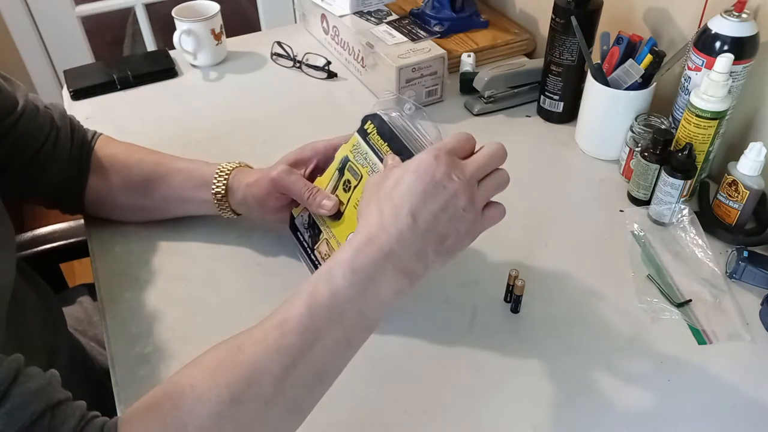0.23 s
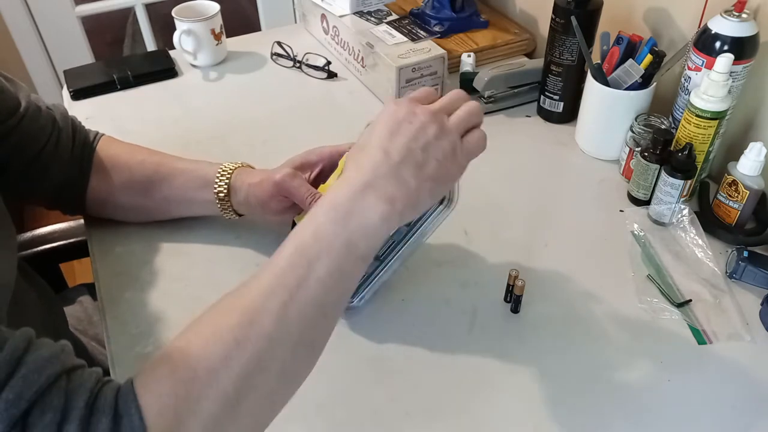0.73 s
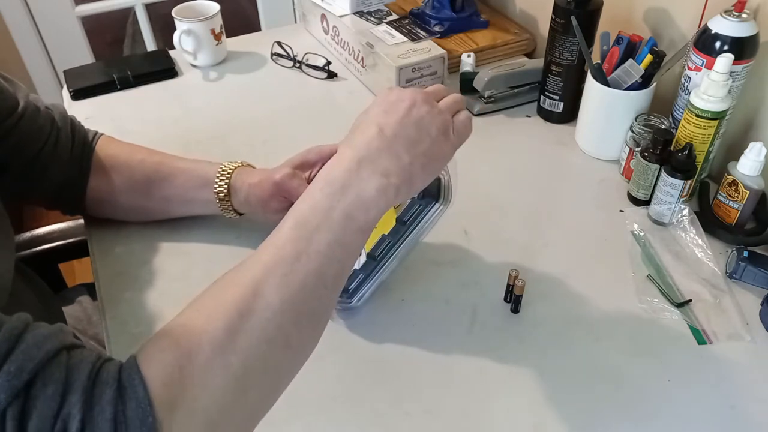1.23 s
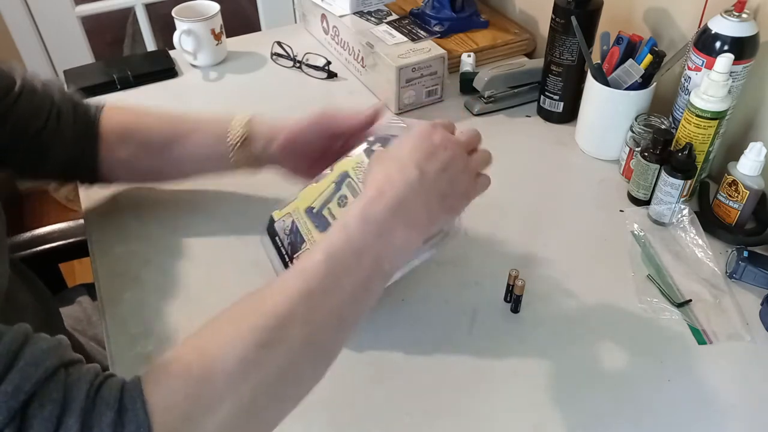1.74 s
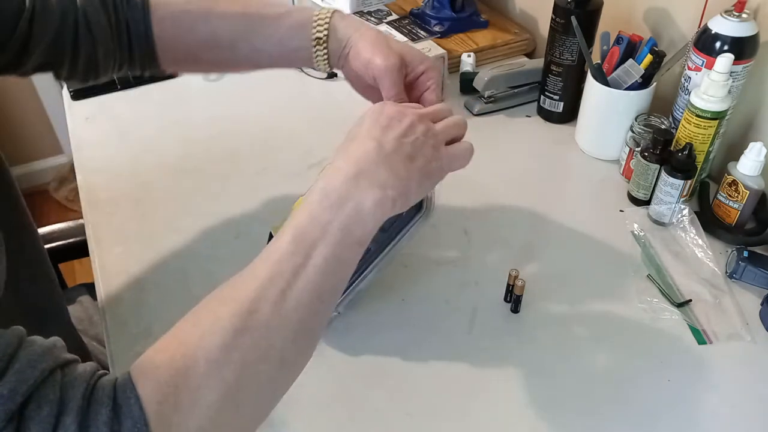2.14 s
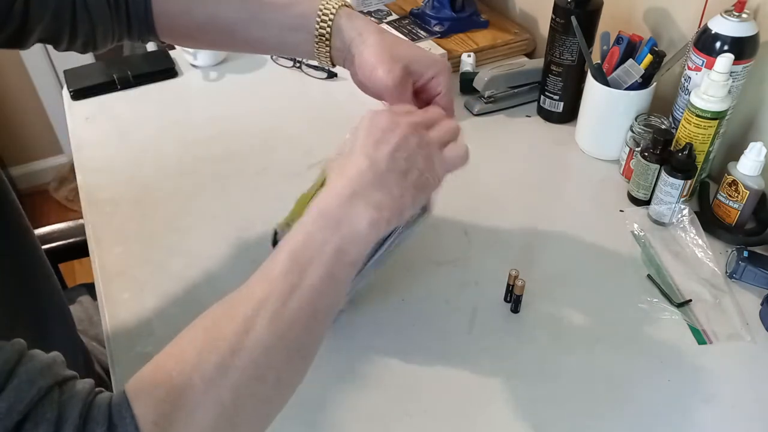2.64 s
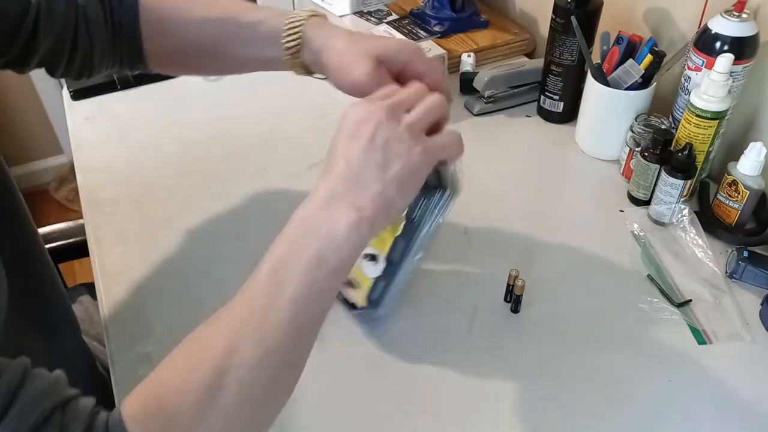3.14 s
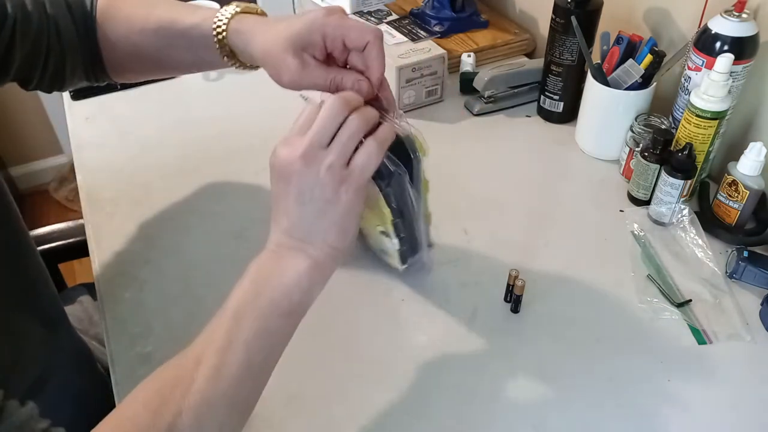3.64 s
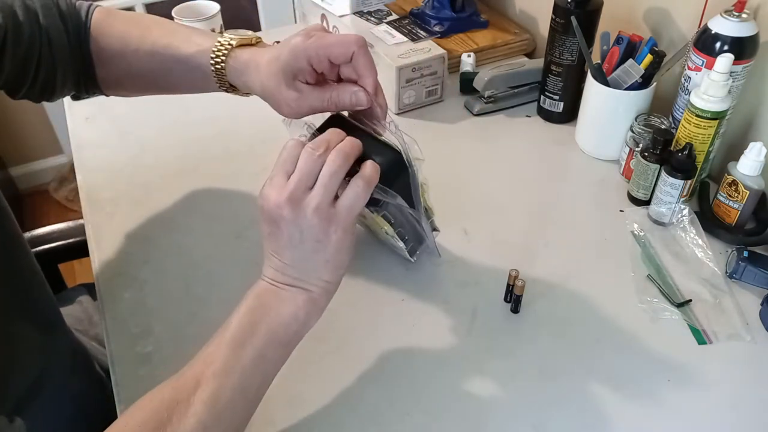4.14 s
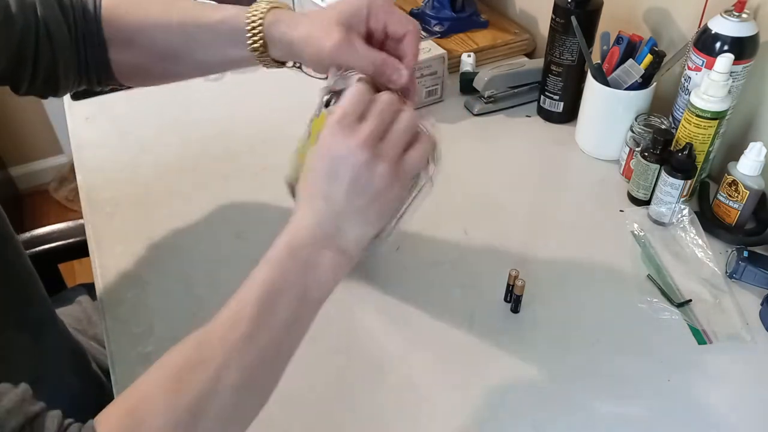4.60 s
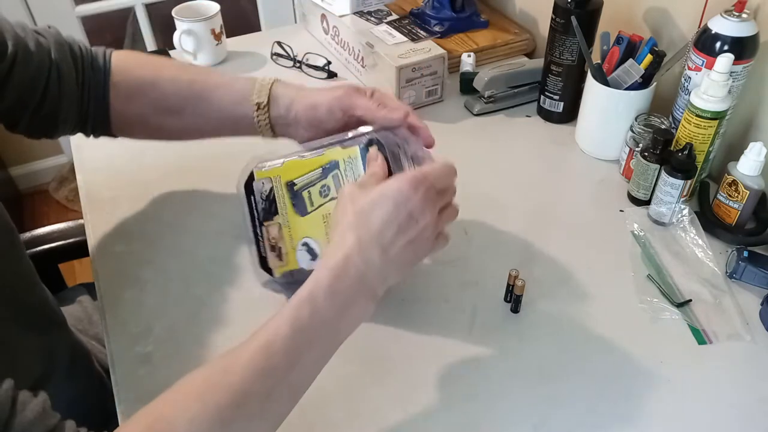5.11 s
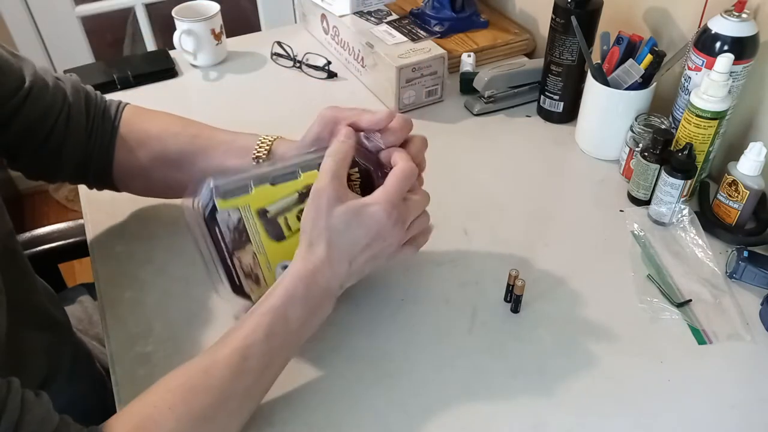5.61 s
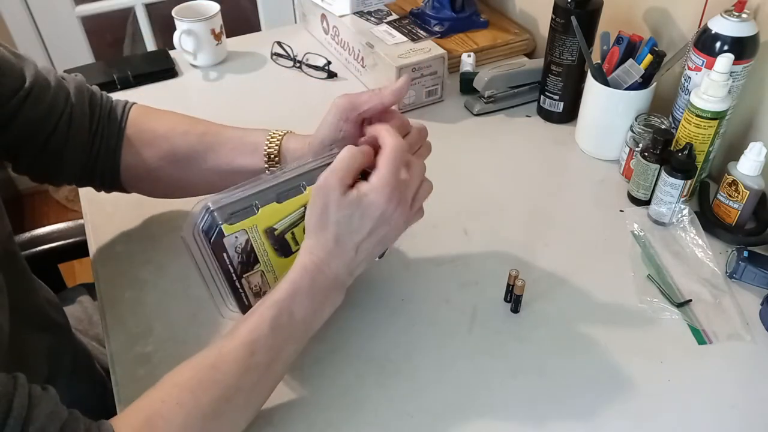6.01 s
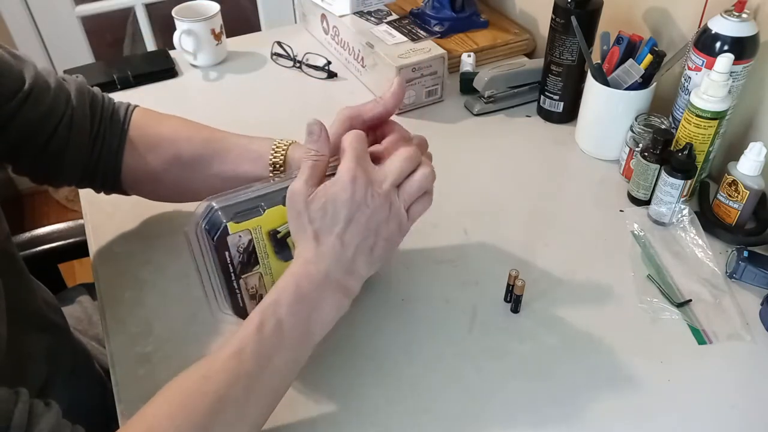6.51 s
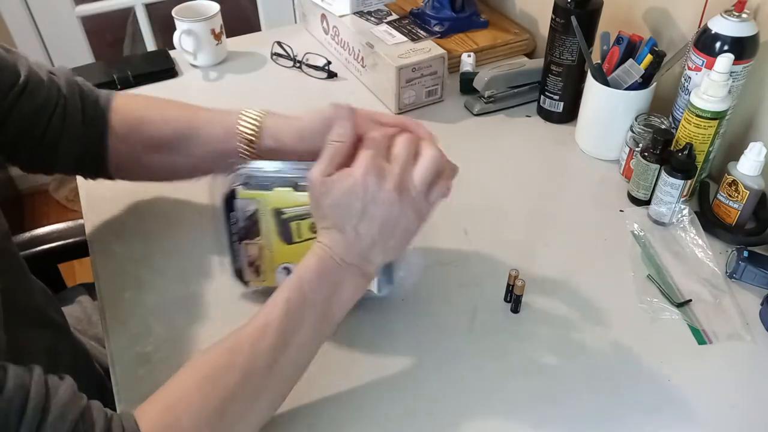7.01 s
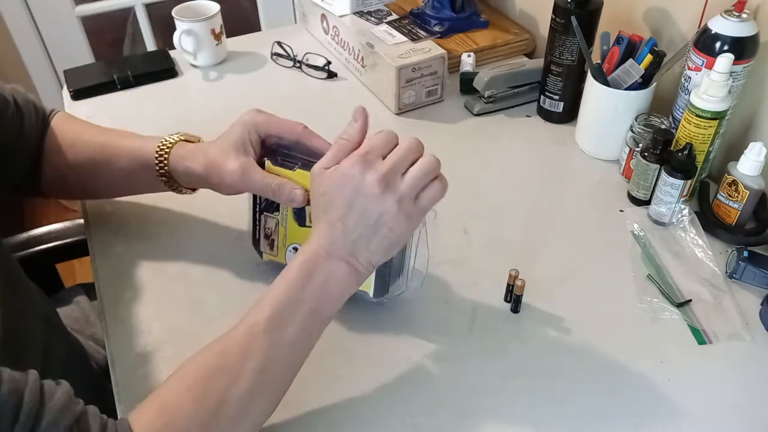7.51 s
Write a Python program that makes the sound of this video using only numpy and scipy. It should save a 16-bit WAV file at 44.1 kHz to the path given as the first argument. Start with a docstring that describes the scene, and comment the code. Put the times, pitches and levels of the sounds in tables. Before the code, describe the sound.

Hands pry at a stiff plastic clamshell pack on a table. A sharp snap and a short rip of the seam come first, then scattered clicks and faint rubbing, and a second snap and rip. The pack scrapes, thumps low on the tabletop, and buckles in a dense burst of crackling before a few last snaps and a hollow knock. It is heard in mono in a quiet furnished room with a short echo.

```python
"""A table in a furnished room, where hands pry at a stiff plastic clamshell pack; heard in mono.
The pack rubs along in stick-slip strokes, its panels buckle with sharp snaps, and its seam rips in
short runs. Now and then it knocks on the table top, which booms low. The plastic gets its colour from
the pack's hollow, its shell and its thin edges; a short room tail and a quiet hush sit behind it."""
import sys
import numpy as np
from scipy import signal
from scipy.io import wavfile

SR = 44100
rng = np.random.default_rng(int(sys.argv[2]) if len(sys.argv) > 2 else 0)


def bounce(signal):
    """Save signal as a 16-bit WAV file at the path given by the first command-line argument."""
    frames = np.transpose(np.atleast_2d(signal))
    limited = np.clip(frames, -1, 1)
    pcm = np.round(limited * 32767).astype(np.int16)
    wavfile.write(sys.argv[1], SR, pcm)


N = 341775

# buckling panels: t/s, crack length/ms, level/dB, bass trim/dB, treble trim/dB, room send/dB, panel f/Hz
SNAPS = [(0.0594, 0.88, -46.0, -17.0, 12, -12, 4500), (0.1057, 1, -14, -11, 4.5, -1.5, 5400),
         (0.4523, 6.1, -39, -16, -1.5, -0.5, 1810.0), (0.5341, 4.3, -37.5, -3.0, -30.0, -41.0, 1490.0),
         (0.6214, 2.9, -29.5, -16.0, 1, 1.5, 1420), (0.8457, 4.8, -46.5, -6.5, -3, 1, 1385),
         (0.892, 3.3, -24, -6, 12, -2.5, 2820), (0.9628, 3.2, -20.5, -12.5, -4, -6, 1700),
         (0.9751, 5.4, -10, -20.0, 1.5, -6.5, 1885), (1.1206, 3.6, -19.0, -12, 8.5, -8.0, 5600),
         (1.2899, 2, -12.5, -13, -3.5, -8.5, 1890), (1.4143, 2.1, -32, -14.5, -39, 0.5, 2830),
         (1.5598, 2.5, -39.5, -2.5, 18.5, -3.5, 4500.0), (1.828, 3.0, -66.5, -28.5, 12.5, 11.5, 1900.0),
         (2.0526, 2.9, -41.5, -6, -6, -15, 1840), (2.0807, 1.3, -40, -6, -17, -18, 1890),
         (2.2014, 4.6, -34.5, -18, 4.5, -9, 1810), (2.35, 1.8, -42.5, -26.5, -7.0, -3, 2290),
         (2.4224, 2.6, -35, -40.0, 19, -6, 1860), (2.4393, 4.5, -26, -25, 8, -4.5, 1830),
         (2.4603, 2, -28.0, -20, 8, -6, 3480.0), (2.471, 3.1, -31.5, -20, 11.5, -2, 1850),
         (2.4846, 4.4, -36, -32.5, 14.5, -7, 1830), (2.5469, 3.1, -24.5, -31, 7.5, -6.5, 1550.0),
         (2.6612, 1.7, -8, -19, 5, -6, 1800), (2.718, 2.5, -15, -17, -1.5, 1.5, 1310),
         (3.1334, 3.1, -30.5, -12.0, -5.5, 0, 1790), (3.215, 4.5, -27, -20.5, -8, -7.5, 1610),
         (3.331, 2.6, -26, -4, -10, -7, 1720.0), (3.448, 3.8, -43.5, -15.5, 8.5, -3, 1790.0),
         (3.483, 2.5, -40, -3, 3.5, 2, 1120), (4.1777, 1.9, -31.5, 2.5, -32, -7.5, 1360.0),
         (4.268, 2.8, -40.5, -14, 4, -8.5, 4570.0), (4.4792, 2.7, -39, -11.5, -35.0, -1, 2140.0),
         (4.6576, 5.4, -28, -4, -3.0, -2, 2030.0), (4.8024, 2.8, -29.5, -13, -8.0, 0, 1440),
         (4.9722, 5.7, -26.5, -11, -11, 1, 2330), (5.073, 1.9, -28, -9, 2.5, -4.5, 1640),
         (5.1342, 1, -37.5, -8, 0, -9, 5760), (5.2729, 0.93, -27.5, -11, 0, 1.5, 9200),
         (5.2812, 2.6, -19.5, -12, 2, -7, 8700), (5.4252, 1, -30.5, -9, 2, -20.0, 6370),
         (5.5239, 4.4, -25, -18.5, -14, -13.5, 1700.0), (5.5441, 4.3, -12, -14, -0.5, -7, 1700),
         (5.5637, 1, -7.5, -23.5, -0.5, -5, 2930.0), (5.5857, 3.3, -12.5, -12.5, 0.5, -4.5, 2070.0),
         (5.631, 3.0, -19, -2, 1, -26, 1200.0), (5.647, 0.65, -13.5, -8, 3.5, -5.5, 1990),
         (5.6667, 1.6, -12.0, -19.5, -17, -3.5, 2800), (5.683, 4, -18, -16, -6, -19, 2700),
         (5.758, 2.3, -31.5, -11, 0, -19, 2000.0), (5.7713, 0.61, -20, -12, -7, -2.5, 2130),
         (5.783, 2.0, -25, -11, -2, -13, 2470), (5.8066, 0.58, -12.5, -9.5, -6, -8.5, 2520),
         (5.8144, 4.2, -9.5, -25, -6.5, -5, 2510), (6.3725, 3.7, -21, -10, -2, -8.0, 3090),
         (6.7334, 4.3, -20.5, -6.5, -11, -4, 2360), (6.7883, 10, -23.5, -11, -3, -5.5, 2370),
         (6.8104, 1.8, -29, -12, 4, -2, 10000), (6.826, 1.1, -8.5, -13.5, -12.5, -3, 10130),
         (7.1417, 3.7, -29, -15, -24, 4.5, 3030.0), (7.1598, 2.1, -24.5, 3.5, 2, -5, 7300),
         (7.2511, 2.9, -34, 2, -32.0, -2.5, 2450), (7.5919, 1.6, -49.5, -13.0, 4.5, -19, 2740),
         (7.6906, 1.4, -30.5, -1, -11, -3, 1480.0), (7.6988, 4.8, -18, -10, -4.5, -2, 1600),
         (7.713, 3.0, -18.5, -13.5, -33.0, 0, 2200.0)]
# resonances of the table top and the pack's hollow, shell and thin edges: f/Hz, width/Hz, level/dB
TABLE_MODES = [(69, 15, -7.5), (122.5, 9.7, 5), (181.3, 13, 3), (233.2, 5.7, 2)]
HOLLOW_MODES = [(284, 76, 2), (418, 86.5, 5), (588.5, 165, -2), (697, 85, 6.5), (711, 318, 0)]
SHELL_MODES = [(1014, 470, 6.5), (1550, 654, 10.5), (2315, 1290, 7), (2832, 250, 10), (3460, 1500, -6.5)]
EDGE_MODES = [(4073, 1840, -3), (6500, 1400, -1), (7980, 730, 6.5), (9570, 6500, 0), (13600, 9800, -7.5)]


def from_db(db):
    """Gain of a level in dB."""
    return 10 ** (np.asarray(db) / 20)


def rms_one(x):
    """Scaled to rms 1."""
    return x / np.sqrt(np.mean(x ** 2) + 1e-20)


def at_hz(points, hz, column=1):
    """A column of a table, read on a log-frequency axis."""
    points = np.array(points)
    return np.interp(np.log(hz), np.log(points[:, 0]), points[:, column])


def resonator(hz, width_hz):
    """Filter coefficients of one resonance, with a peak gain of 2."""
    r = np.exp(-np.pi * width_hz / SR)
    return [1 - r * r, 0, r * r - 1], [1, -2 * r * np.cos(2 * np.pi * hz / SR), r * r]


def body(x, modes):
    """Parallel resonances with alternating signs, scaled so that white noise keeps about its rms."""
    out, power = 0, 0
    for k, (hz, width_hz, level_db) in enumerate(modes):
        ring = signal.lfilter(*resonator(hz, width_hz), x + 1e-18) / 2
        out = out + (-1) ** k * from_db(level_db) * ring
        power += from_db(2 * level_db) * np.pi * width_hz / SR
    return out / np.sqrt(power)


def dulled(x, hz):
    """Low-pass: thick, soft parts radiate no treble."""
    return signal.sosfilt(signal.butter(2, hz, fs=SR, output="sos"), x)


def grains(per_s, spread_db):
    """Random slips of very unequal size; rms 1."""
    sizes = from_db(spread_db * np.minimum(rng.exponential(1, N), 5)) * rng.choice([-1, 1], N)
    return rms_one(sizes * (rng.random(N) < per_s / SR))


def coloured(size, gain_of_band):
    """Half-octave bands of noise, each times its own gain."""
    out, white = 0, rng.standard_normal((2, size))
    edges = 30 * 2 ** np.arange(0, 9.6, .5)
    for k, (low, high) in enumerate(zip(edges, edges[1:])):
        band = signal.butter(2, [low, min(high, .45 * SR)], "band", fs=SR, output="sos")
        out = out + signal.sosfilt(band, white[k % 2]) * gain_of_band(np.sqrt(low * high))
    return out


def room_tone():
    """A steady, quiet hush with scooped mids."""
    # spectrum of the hush: f/Hz, relative density/dB
    spectrum = [(30, -9.5), (390, -11.5), (900, -25.5), (4000, -27), (9000, -11.5), (15500, -8)]
    return from_db(-68) * rms_one(coloured(N, lambda hz: from_db(at_hz(spectrum, hz))))


def rubbing(pressed_from_s=3.1):
    """Strokes swell and fade over a faint rustle; stick-slip grains drive the table and the pack."""
    # hands and table sliding along the pack: peak t/s, time to fade by 20 dB/s, shell level/dB,
    # then relative to the shell: boom/dB, hollow/dB, crackle/dB
    strokes = [(0.0, 0.067, -48, -5.5, 3, -10), (.56, 0.29, -47, -34, 2, -29),
               (0.68, 0.064, -46, -7, 3.5, 4.5), (1.577, 0.13, -43, -5.5, 2.5, 0.5),
               (2.1, 0.21, -55, -2, -0.5, -1), (2.52, 0.099, -46.5, -7, 1, 1),
               (3.15, 0.25, -61.5, -2, 17, -20), (3.23, 0.094, -42, -10, 7, -5),
               (3.583, 0.098, -28.5, -21, -2, -9), (3.739, 0.075, -37.5, -2.5, 11, -5.5),
               (4.288, 0.095, -64, 22, 5, -3), (4.583, 0.053, -36.5, -3, 4.5, -5),
               (4.72, 0.12, -48, -33, -25, 8.5), (4.856, 0.041, -24, -21, 4, -10.5),
               (5.016, 0.069, -35.5, -4.5, 7.5, -6.5), (5.23, 0.079, -37, -12, 5.5, -3),
               (5.471, 0.15, -33, -6.5, 4, -10), (5.602, 0.13, -19.5, -18, -3.5, -16),
               (5.675, 0.052, -19.5, -12.5, 1, -4), (5.824, 0.076, -25, -16, 4.5, -13),
               (6.38, 0.02, -35, -21, -5, -0.5), (6.48, 0.019, -37, -14, -0.5, -4),
               (6.619, 0.051, -26, -12, 3, -6), (6.77, 0.062, -29.5, -9, -2, -13),
               (6.87, 0.052, -29, -9, 1, 0), (6.96, 0.075, -23, -41, -6.5, -6),
               (7.142, 0.12, -32, -13, 4, -12.5), (7.474, 0.13, -37, -3.5, 5, -10.5),
               (7.75, 0.043, -23.5, 2, 1, -4.5)]
    # fingers rustling between strokes: t/s, shell level/dB
    rustle = [(0, -76), (.3, -46.5), (.55, -74), (.82, -80), (1.3, -43), (1.5, -63), (1.8, -73),
              (2.3, -60.5), (2.62, -64), (2.95, -53), (3.4, -49), (3.8, -61), (4.0, -65), (4.45, -84.5),
              (4.6, -74.5), (5.15, -48), (5.4, -67.5), (6.13, -54), (6.33, -80), (6.55, -52), (7.05, -43),
              (7.35, -45.5), (7.65, -57.5), (7.75, -52)]
    # forearms shifting on the table: f/Hz, width/Hz, level/dB
    rumble_modes = [(64, 38, 0), (130, 70, 3)]
    peak_s, fade_s, shell_db, boom_db, hollow_db, crackle_db = np.array(strokes).T[:, :, None]
    steps = np.arange(0, N + 64, 64)
    late = (steps / SR - peak_s) / fade_s
    stroke_db = shell_db - 20 * np.where(late > 0, late, -late / 1.15) ** 1.7   # rise outlasts fade
    rustle_db = np.interp(steps / SR, *np.transpose(rustle))

    def envelope(stroke_trim_db=-np.inf, rustle_trim_db=-np.inf):
        power = np.sum(from_db(2 * (stroke_db + stroke_trim_db)), axis=0)
        power += from_db(2 * (rustle_db + rustle_trim_db))
        return np.interp(np.arange(N), steps, np.sqrt(power))

    coarse, fine = grains(700, spread_db=3.0), grains(4000, spread_db=3.5)
    pressed = np.arange(N) > pressed_from_s * SR   # pack held down: the rustle rings the table top
    arms = envelope(rustle_trim_db=-5)
    top = body((envelope(boom_db) + pressed * arms) * coarse, TABLE_MODES)
    rumble = body(~pressed * arms * coarse, rumble_modes)
    boom = dulled(top + rumble, hz=400)
    hollow = dulled(body(envelope(hollow_db, -1.5) * coarse, HOLLOW_MODES), hz=1490)
    friction = envelope(0, 0) * fine
    shell = dulled(body(friction, SHELL_MODES), hz=4500) + from_db(-21) * panel_ring(friction)
    crackle = body(envelope(crackle_db, -4) * fine, EDGE_MODES)
    return boom + hollow + shell + crackle


def panel_ring(friction, width_hz=490):
    """The panel that buckled last rings on at its own pitch under the rubbing."""
    out, state = np.zeros(N), np.zeros(2)
    times_s, pitches_hz = np.array(SNAPS)[:, [0, -1]].T
    starts = np.sort((times_s * SR).astype(int))
    for start, end, hz in zip(starts, [*starts[1:], N], pitches_hz):
        span = slice(start, end)
        out[span], state = signal.lfilter(*resonator(hz, width_hz), friction[span] + 1e-18, zi=state)
    return out / 2 / np.sqrt(np.pi * width_hz / SR)


def snaps(click_s=0.0032, spike_share=.55, colour_spread_db=3, places=3):
    """A panel buckles: a click, then a brief crack. Gives the dry snaps and clicks for the room sends."""
    age = np.arange(900) / SR
    click = rms_one(1. * (age == 0)) * np.sqrt(click_s / age[-1])
    panel_share = np.array([[1.8], [.38]])   # dry, room send
    low, upper = np.zeros((2, 1 + places, N + len(age)))
    for k, (s, length_ms, level_db, bass_db, treble_db, send_db, panel_hz) in enumerate(SNAPS):
        length_s = length_ms / 1000
        intensity = np.sqrt(click_s / length_s)   # a short crack is more intense
        crack = intensity / (1 + (age / length_s) ** 6)
        knock = intensity * np.exp(-age / (1.7 * length_s))
        bursts = np.array([knock, crack, crack]) * rng.standard_normal((3, len(age)))
        bass, broad, bright = (np.array([burst + spike_share * click, click]) for burst in bursts)
        # each snap rings a different thin edge and strikes the resonances with other strengths
        edge_hz = rng.uniform(9200, 11000)
        shell, edges = (np.array(modes) + [0, 0, colour_spread_db] * rng.standard_normal((len(modes), 1))
                        for modes in (SHELL_MODES, EDGE_MODES))
        mid = body(broad, shell) + panel_share * body(broad, [(panel_hz, 0.085 * panel_hz, 0)])
        high = body(bright + .22 * body(bright, [(edge_hz, 1200, 0)]), edges)
        high[0] += from_db(-23.5) * body(bright[0], [(13500, 6200, 0)])   # the very top stays dry
        rows = [0, 1 + k % places]   # dry, and one of the places in the room
        span = slice(round(s * SR), round(s * SR) + len(age))
        gains = from_db([[level_db], [level_db + send_db]])
        low[rows, span] += gains * from_db(bass_db + 5.5) * bass
        upper[rows, span] += gains * (from_db(-9.0) * mid + from_db(treble_db - 4.5) * high)
    out = (dulled(body(low, HOLLOW_MODES), hz=1540) + upper)[:, :N]
    return out[0], out[1:]


def rips():
    """The seam tears on after a loud snap, in a short run of dense cracking."""
    # runs along the seam, each cued to the nearest snap: t/s, length/s, level/dB, treble trim/dB
    runs = [(.106, 0.064, -28.5, 9), (2.661, 0.069, -29, 5.5), (6.833, 0.055, -35.5, -20)]
    t, mid, high = np.arange(N) / SR, np.zeros(N), np.zeros(N)
    for s, length_s, level_db, treble_db in runs:
        start_s = min(np.array(SNAPS)[:, 0], key=lambda snap_s: abs(snap_s - s))
        run = from_db(level_db) * (t > start_s) / (1 + (np.abs(t - start_s) / length_s) ** 6)
        mid += run
        high += run * from_db(treble_db)
    slips = grains(8300, spread_db=4.5)
    hollow = from_db(-3.5) * body(slips * mid, HOLLOW_MODES)
    return body(slips * mid, SHELL_MODES) + hollow + body(slips * high, EDGE_MODES)


def thumps(push_s=0.0012):
    """The pack lands: a soft push rings the table top and the pack's hollow."""
    # knocks on the table: t/s, push on the top/dB, push on the hollow/dB
    landings = np.array([(0.625, -23, -19.5), (1.561, -21.5, -22), (2.511, -28, -30), (2.663, -19, -34),
                         (4.178, -26, -24), (4.268, -29.5, -29), (4.802, -8, -13), (4.972, -24.5, -31),
                         (6.157, -35, -31), (7.1646, -24, -5.5)])
    push, hits = np.hanning(round(push_s * SR)), np.zeros((2, N))
    hits[:, [round(s * SR) for s in landings[:, 0]]] = from_db(landings[:, 1:].T)
    top, pack = signal.lfilter(push / np.sqrt(np.sum(push)), 1, hits)
    return body(top, TABLE_MODES) + body(pack, HOLLOW_MODES)


def room(x, near_t60_s=0.19, near_db=13, wet_db=2.5):
    """Reverb: a quick tail from table and clutter over the slower one of the walls."""
    # tail of the walls: f/Hz, t60/s, relative level/dB
    wall_decay = [(125, 0.65, -2.5), (503, 0.53, -4.5), (1900, 0.69, -1.5), (7500, 0.64, -6.5),
                  (14000, 0.24, -5)]
    age = np.arange(30000) / SR

    def decay(hz):
        walls = from_db(at_hz(wall_decay, hz, column=2) - 60 * age / at_hz(wall_decay, hz))
        return walls * (1 + from_db(near_db - 60 * age / near_t60_s))

    fade_in = 1 - np.exp(-(age / 0.0044) ** 2)
    tail = coloured(len(age), decay) * fade_in
    return from_db(wet_db) * signal.oaconvolve(x, tail / np.sqrt(np.sum(tail ** 2)))[:N]


def scene():
    """Pack, table, reverb and room tone, the same in both channels."""
    cracks, click_sends = snaps()
    ripping = rips()
    on_table = rubbing() + thumps()
    hush = room_tone()
    reverb = room(ripping + from_db(-10.5) * on_table)
    reverb += from_db(5.0) * sum(room(send) for send in click_sends)   # each place has its own tail
    mono = cracks + ripping + on_table + reverb + hush
    return np.stack([mono, mono])


def record(dry):
    """Soft clipping rounds the peaks, and a steep low-pass cuts the very top."""
    rounded = .95 * np.tanh(dry / .95)
    return signal.sosfilt(signal.cheby2(12, 60, 16660, fs=SR, output="sos"), rounded)


dry = scene()
out = record(dry)
bounce(out)
```